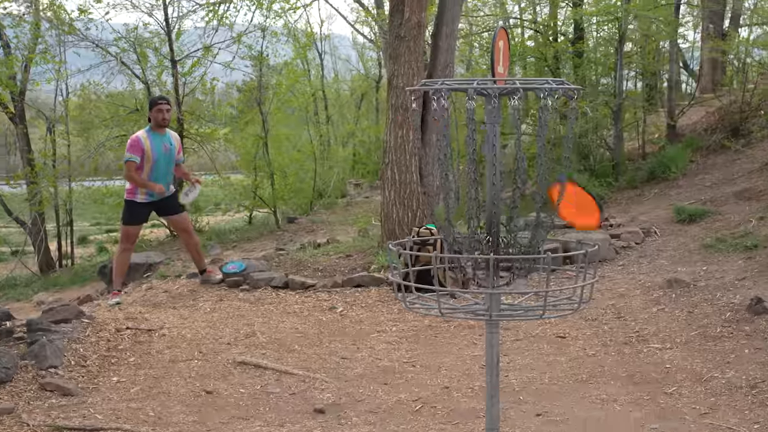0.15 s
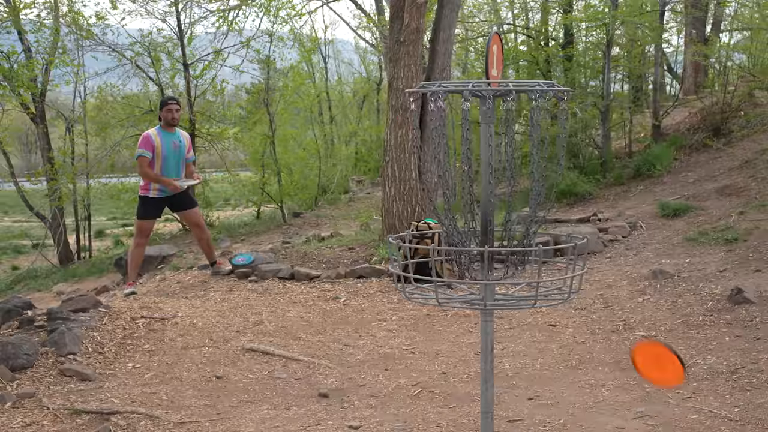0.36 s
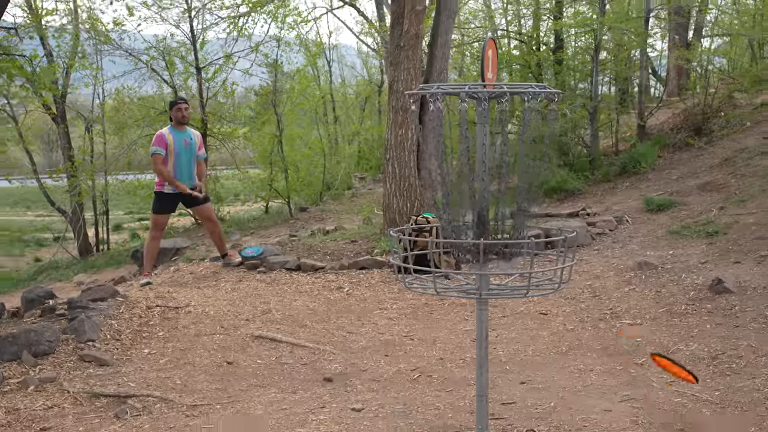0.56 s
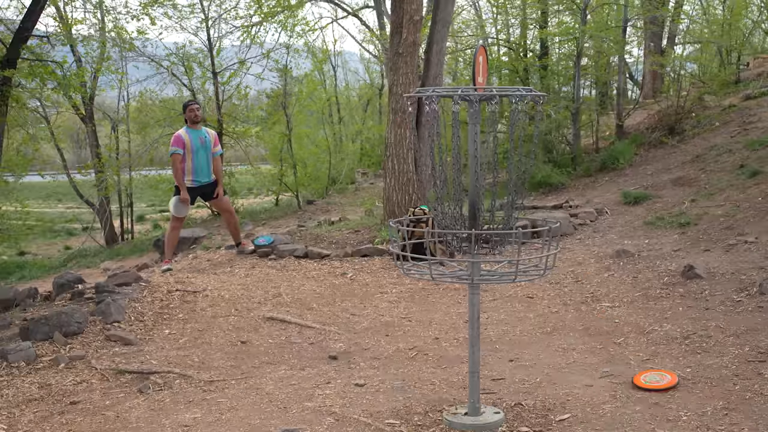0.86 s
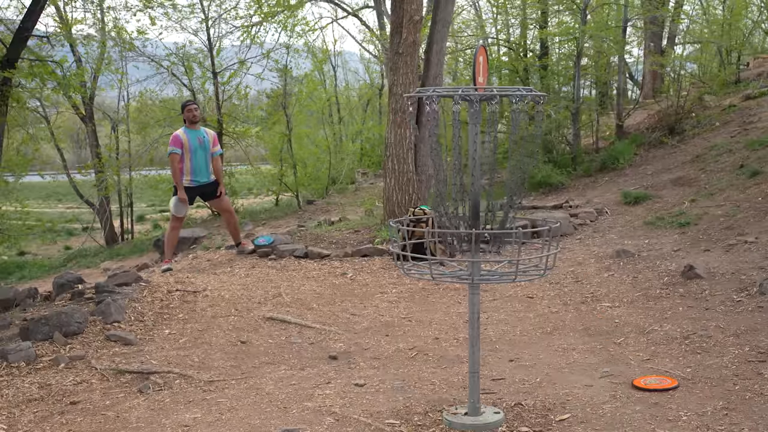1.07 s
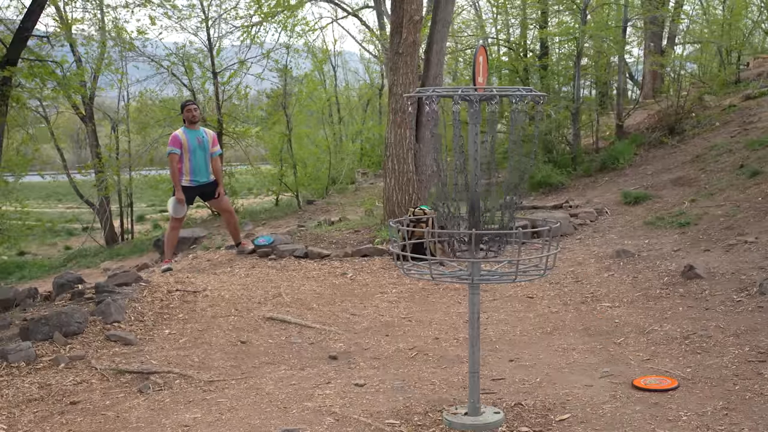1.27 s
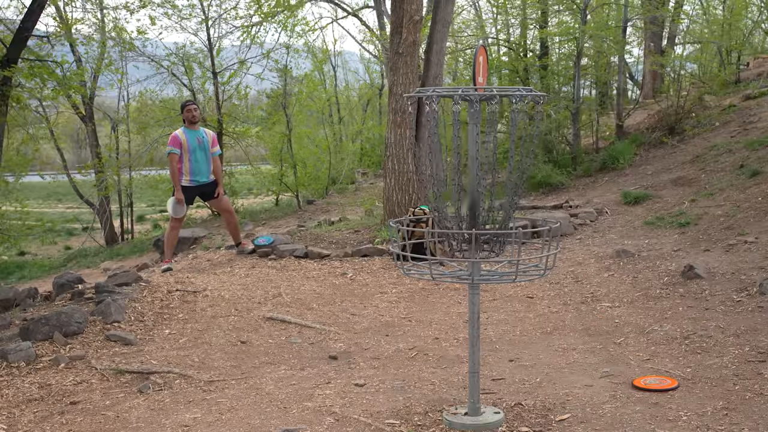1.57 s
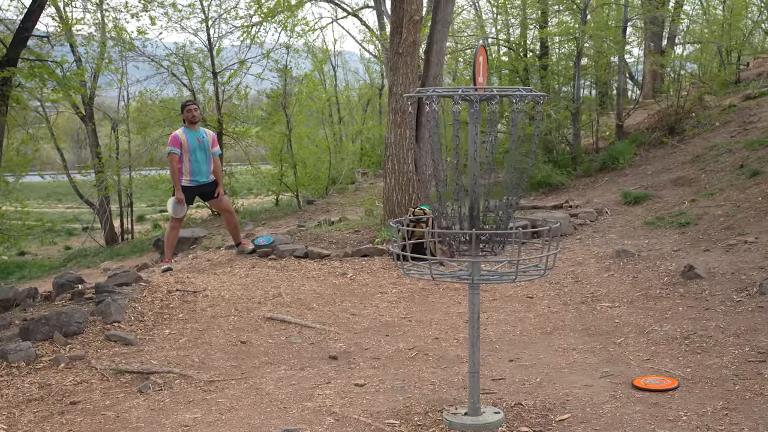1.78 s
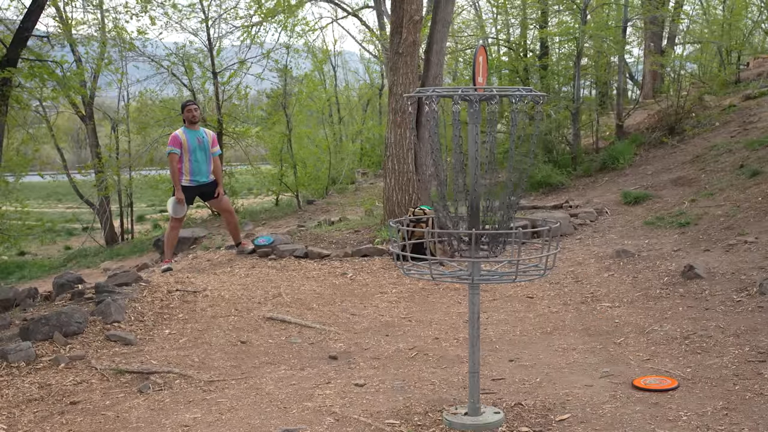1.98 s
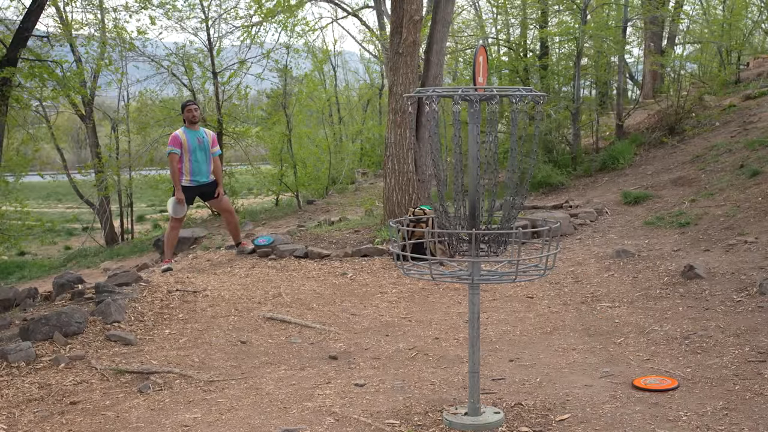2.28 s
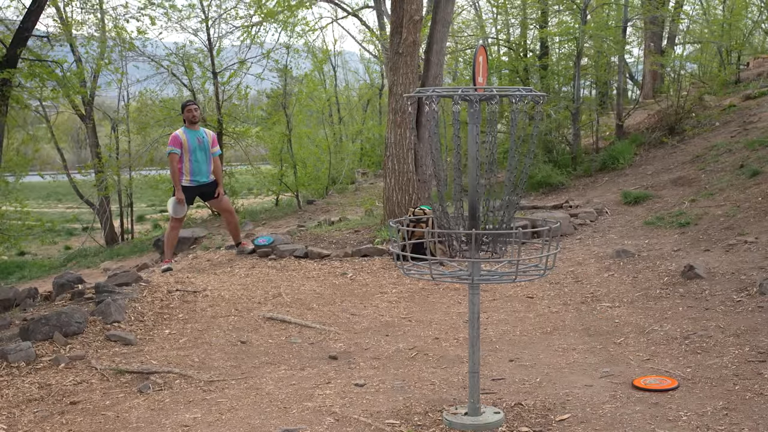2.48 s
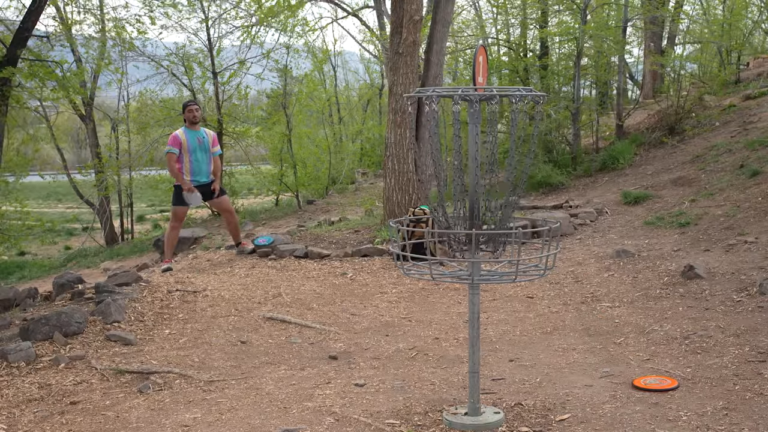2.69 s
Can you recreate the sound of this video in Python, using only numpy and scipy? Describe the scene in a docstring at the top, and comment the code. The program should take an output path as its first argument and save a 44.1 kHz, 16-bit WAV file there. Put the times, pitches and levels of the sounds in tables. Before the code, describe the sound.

Steel chains clash loudly at once as a disc hits, jangling close to the microphone; the disc thuds on dry dirt and bounces, links thin to tinkles over quiet outdoor air and faint distant engine drone.

```python
"""Outdoors on dry dirt, near a steel basket hung with chains that a thrown disc has just hit.
Far off, engine tones waver and a bird chirps over a hush of shaped noise.
Nearby the disc drops out and bounces: short body modes and bursts of grit noise.
Links rub, clatter and jangle as random contacts, then thin out to single ringing tinkles.
Chains knock on the steel: each blow is a noise crack, a short clank and decaying low and high rings."""
import sys
import numpy as np
from scipy import signal
from scipy.fft import rfft, irfft, next_fast_len
from scipy.io import wavfile

SR = 44100
rng = np.random.default_rng(int(sys.argv[2]) if len(sys.argv) > 2 else 0)


def to_wav(s):
    """Save 16-bit WAV."""
    ch = np.atleast_2d(s).T  # columns
    pcm = np.round(np.clip(ch, -1, 1) * 32767)  # PCM
    wavfile.write(sys.argv[1], SR, pcm.astype(np.int16))


N = 125685
T = np.arange(N) / SR  # time [s]


def from_db(db):
    """Decibels to amplitude gain."""
    return 10 ** (np.asarray(db) / 20)


def rms_one(x):
    """Scale to unit rms."""
    return x / np.sqrt(np.mean(x ** 2) + 1e-20)


def in_time(rows):
    """Join (time [s], value) rows by straight lines."""
    return np.interp(T, *np.transpose(rows))


def drift(corner_hz):
    """Slow chance of unit rms: noise at SR / 40 through two equal low-pass poles."""
    pole = np.exp(-80 * np.pi * corner_hz / SR)
    white = rng.standard_normal(N // 40 + 2002)
    slow = signal.lfilter([1], [1, -2 * pole, pole * pole], white)[2000:]  # skip the filter's start
    return np.interp(np.arange(N) / 40, np.arange(len(slow)), rms_one(slow))


def noise(spectrum):
    """Steady noise of unit rms, coloured by (frequency [Hz], relative density [dB]) rows."""
    hz, db = np.transpose(spectrum)
    size = next_fast_len(N)
    white = rfft(rng.standard_normal(size))
    bin_hz = np.arange(len(white)) * SR / size
    gain = from_db(np.interp(np.log(bin_hz + 1), np.log(hz), db))
    return rms_one(irfft(white * gain, size)[:N])


def clicks(times, levels_db):
    """One single-sample click at each time."""
    out = np.zeros(N)
    samples = np.clip(np.asarray(times) * SR, 0, N - 1).astype(int)
    np.add.at(out, samples, from_db(levels_db))
    return out


def random_clicks(per_s, spread_db):
    """Contacts at random moments; the spread sets how uneven their strength is."""
    happens = rng.random(N) < per_s / SR
    return happens * from_db(spread_db * np.minimum(rng.exponential(1, N), 3))


def dying(hits, t60):
    """Envelope that jumps at each click; its power falls 60 dB in t60 [s]."""
    power_decay = from_db(-120 / (t60 * SR))
    return np.sqrt(signal.lfilter([1], [1, -power_decay], hits ** 2 + 1e-24))


CHOKE_S = 0.012  # fade of a choked ring once the next blow lands
PHASE_SPREAD_RAD = 1.5


def strike(times, levels, modes, detune, scatter_db, choked=False):
    """Each blow rings all modes with its own slight detuning and balance; a choked ring stops at the next."""
    hz, db, t60 = np.transpose(modes)[:, :, None]
    t = T[:int(SR * min(t60.max(), 1))].astype(np.float32)
    decay = from_db(db - 60 * t / t60).astype(np.float32)
    out = np.zeros(N + SR)
    gaps = np.diff(times, append=T[-1])
    for time, gap, level in zip(times, gaps, levels):
        pitch, size, phase = rng.standard_normal((3, len(modes), 1))
        held = np.clip((gap - t) / CHOKE_S + 1, 0, 1) if choked else np.ones(len(t))
        n = np.count_nonzero(held)
        start = max(int(time * SR), 0)
        omega = np.float32(2 * np.pi * hz * (1 + detune * pitch))
        waves = decay[:, :n] * np.sin(omega * t[:n] + np.float32(PHASE_SPREAD_RAD * phase))
        mode_gain = np.float32(from_db(level + scatter_db * size))
        out[start:start + n] += held[:n] * (mode_gain * waves).sum(axis=0)
    return out[:N]


def ring(hits, hz, t60):
    """Two-pole resonator: a unit click sets a decaying sine of height 1 ringing."""
    r = from_db(-60 / (t60 * SR))
    w = 2 * np.pi * hz / SR
    return signal.lfilter([0, np.sin(w)], [1, -2 * r * np.cos(w), r * r], hits + 1e-18)


def flutter(x, depth):
    """Make a tone flutter in level, as ringing steel chattering on its neighbours does."""
    return x * (1 + depth * drift(52)) / np.sqrt(1 + depth ** 2)


# Outdoor hush and far traffic, colour: (frequency [Hz], relative density [dB])
HUSH_COLOUR = [(30, -46), (55, -37), (80, -9), (110, -1.5), (170, 3.5), (230, 3.5), (330, -6), (520, -12.5),
               (900, -5.5), (1300, -7), (2000, -13.5), (3000, -22), (4500, -31), (8000, -38), (15500, -42)]
# Level of the hush: (time [s], level [dB])
HUSH_LEVEL = [(0, -46), (.6, -48.5), (1.1, -48), (1.4, -51), (1.9, -49.5), (2.3, -51), (2.6, -47.5),
              (2.85, -50.5)]


def hush():
    """The open air and far traffic blend into coloured noise that slowly swells and sinks."""
    return from_db(in_time(HUSH_LEVEL)) * noise(HUSH_COLOUR)


def drone(hz, db):
    """A far engine's firing tone, its pitch and level wavering on its way."""
    phase = 2 * np.pi * np.cumsum(hz * (1 + 0.018 * drift(12))) / SR
    level_db = db + 1.5 * drift(9)
    return np.sqrt(2) * from_db(level_db) * np.sin(phase)


# Firing tone of the main far engine, before its waver: (time [s], frequency [Hz])
ENGINE_PITCH = [(0, 156), (.12, 146), (.22, 128), (.4, 126), (.6, 122), (.85, 126), (1.2, 129), (1.55, 133),
                (2.2, 133.5), (2.45, 138), (2.85, 143)]
# Its level before the trim: (time [s], level [dB])
ENGINE_LEVEL = [(0.0, -43.5), (0.05, -53), (0.13, -42), (0.19, -48), (1.52, -49.5), (2.13, -44.5),
                (2.21, -52), (2.58, -44), (2.79, -52.5), (2.85, -39.5)]
ENGINE_TRIM_DB = -0.5
# Other far drones that swell and fade: (frequency [Hz], middle time [s], width [s], level [dB])
DRONES = [(85, 1.2, 3.0, -65), (88, 2.57, 0.19, -53.5), (152, 2.074, 0.18, -46), (298, 2.15, 0.23, -58.5)]


def engines():
    """One engine tone glides throughout; the others swell and fade as bell curves."""
    out = drone(in_time(ENGINE_PITCH), in_time(ENGINE_LEVEL) + ENGINE_TRIM_DB)
    for hz, middle, width, db in DRONES:
        out += drone(hz, db) * np.exp(-((T - middle) / width) ** 2)
    return out


# Chirps of the far bird: (time [s], frequency [Hz], level before roughening [dB])
CHIRPS = [(1.885, 4420, -61.5), (1.972, 4360, -59.5), (2.075, 4370, -65), (2.1, 4310, -63),
          (2.201, 4330, -63), (2.3, 4300, -66)]
CHIRP_WIDTH_S, CHIRP_ROUGHNESS = 0.012, 0.85


def bird():
    """A far bird gives faint, short, steady-pitched chirps with a rough level."""
    out = np.zeros(N)
    for time, hz, db in CHIRPS:
        swell = np.exp(-((T - time) / CHIRP_WIDTH_S) ** 2)
        out += from_db(db) * swell * np.sin(2 * np.pi * hz * T)
    return flutter(out, CHIRP_ROUGHNESS)


WOODS_DB, WOODS_T60_S = -12.5, 0.47


def woods(x):
    """Trunks and ground scatter the near sound back as a faint, decaying noise tail."""
    t = T[:SR]
    tail = rng.standard_normal(SR) * from_db(-60 * t / WOODS_T60_S)
    tail *= t > .012  # the first scatter arrives after 12 ms
    return from_db(WOODS_DB) * signal.fftconvolve(x, tail / np.linalg.norm(tail))[:N]


# The disc meets the ground: (time [s], body level [dB], grit level [dB])
LANDINGS = [(0.4706, -28.5, -31), (0.506, -51, -38), (0.656, -57, -38.5), (0.836, -33.5, -30),
            (0.859, -41, -36)]
# Modes of the disc: (frequency [Hz], relative level [dB], t60 [s])
DISC_MODES = [(321, -10.5, 0.063), (410, -2, 0.033), (543, -14, 0.033), (642, 1, 0.037),
              (1058, -13.5, 0.081)]
# Colour of the grit: (frequency [Hz], relative density [dB])
GRIT_COLOUR = [(40, -45), (130, -16), (300, -0.5), (700, 4), (1200, -4.5), (2600, -4.5), (5000, -28),
               (12000, -47)]
GRIT_T60_S, DISC_LOW_CUT_HZ = 0.034, 180  # the disc's sounds carry little bass


def landings():
    """The plastic disc knocks on dry dirt and bounces: damped body modes plus bursts of grit."""
    times, body_db, grit_db = np.transpose(LANDINGS)
    body = strike(times, body_db, DISC_MODES, detune=0.019, scatter_db=1.5)
    grit = noise(GRIT_COLOUR) * dying(clicks(times, grit_db), GRIT_T60_S)
    low_cut = signal.butter(3, DISC_LOW_CUT_HZ, "high", fs=SR, output="sos")
    return signal.sosfilt(low_cut, body + grit)


# Links sliding on each other: (time [s], level [dB])
RUB_LEVEL = [(0.9, -84), (0.95, -66), (1.0, -66.5), (1.1, -61.5), (1.3, -70), (1.38, -84), (1.7, -76),
             (1.72, -66.5), (1.8, -69.5), (1.93, -68.5), (2.0, -91), (2.2, -95.5)]
# Colour of the rubbing: (frequency [Hz], relative density [dB])
RUB_COLOUR = [(3500, -28.5), (4700, -7.5), (5100, 3.5), (5600, -13), (6500, -16), (6780, -4), (7050, -19),
              (8500, -16), (8800, -4), (9150, -20), (10800, -20), (11100, -8.5), (11700, -5),
              (12200, -23.5)]
RUB_PER_S, RUB_T60_S = 200, .04


def rubbing():
    """Swaying links slide over each other in tiny random slips, each a burst of noise."""
    hiss = noise(RUB_COLOUR)
    slips = rms_one(dying(random_clicks(RUB_PER_S, spread_db=2.5), RUB_T60_S))
    return from_db(in_time(RUB_LEVEL)) * hiss * slips


# The chains' dry rattle before trim and last fade: (time [s], level [dB])
CLATTER_LEVEL = [(0.0, -32.5), (0.128, -43.5), (0.132, -37), (0.24, -48.5), (0.392, -46.5), (0.408, -39),
                 (0.428, -43), (0.646, -59.5), (0.67, -55), (0.716, -58), (0.728, -54), (0.974, -68),
                 (1.134, -56.5), (1.4, -84)]
# Colour of the rattle: (frequency [Hz], relative density [dB])
CLATTER_COLOUR = [(250, -27), (500, -10.5), (1200, -0.5), (2200, -2.5), (2700, -6.5), (3150, 8.5),
                  (3700, -7.5), (4400, -3), (5200, -3), (7000, -15), (8250, -8.5), (10000, -6.5),
                  (11500, -16), (15500, -9.5)]
CLATTER_PER_S, CLATTER_T60_S = 480, 0.038
CLATTER_TRIM_DB, CLATTER_FADE_DB_PER_S = 2, 17  # the fade starts at the last row


def clatter():
    """Dense damped contacts of links on the disc and on each other, as bursts of noise."""
    after_last = np.maximum(T - CLATTER_LEVEL[-1][0], 0)
    level_db = in_time(CLATTER_LEVEL) + CLATTER_TRIM_DB - CLATTER_FADE_DB_PER_S * after_last
    rattle = noise(CLATTER_COLOUR)
    contacts = rms_one(dying(random_clicks(CLATTER_PER_S, spread_db=-2.0), CLATTER_T60_S))
    return from_db(level_db) * rattle * contacts


# Top modes of a link: (frequency [Hz], relative level [dB], t60 [s])
LINK_TOP = [(12640, -10, .1), (12820, -6, .13), (12950, -6, .17), (13620, -17, .15), (14100, -9, .14),
            (14220, -9, .14), (15330, -18, .1)]
# Middle modes of a link: (frequency [Hz], relative level [dB], t60 [s])
LINK_MIDDLE = [(4890, -11, .09), (4910, -9, .1), (5000, -7, .1), (5440, -17.5, .08), (6770, -5, 0.09),
               (7300, -17, 0.14), (7650, -14.5, .16), (8270, -13.5, 0.14), (8880, -10, .22),
               (11140, -9, 0.25), (11680, -13, 0.11)]
LINK_FLUTTER = .55  # depth
# The jostling links before the trim: (time [s], level [dB])
JANGLE_LEVEL = [(0.0, -27.5), (0.31, -39.5), (0.42, -28), (0.44, -40), (0.65, -54), (0.68, -45),
                (1.09, -59), (1.11, -41), (1.32, -74), (2.06, -65.5), (2.25, -82.5), (2.85, -79)]
JANGLE_PER_S, JANGLE_TRIM_DB, JANGLE_MIDDLE_DB = 300, -9, -8


def jangle(count=3):
    """Slightly unlike links jostle at random, each contact ringing all modes of its link."""
    out = np.zeros(N)
    for link in range(count):
        hits = random_clicks(JANGLE_PER_S / count, spread_db=0.0)
        rings = np.zeros(N)
        for modes, modes_db in ((LINK_TOP, 0), (LINK_MIDDLE, JANGLE_MIDDLE_DB)):
            for hz, db, t60 in modes:
                link_hz = hz * (1 + .006 * rng.standard_normal())
                rings += from_db(db + modes_db) * ring(hits, link_hz, t60)
        out += flutter(rings, LINK_FLUTTER)
    return from_db(JANGLE_TRIM_DB + in_time(JANGLE_LEVEL)) * rms_one(out)


# Single taps, levels before trims: (time [s], top modes level [dB], middle modes level [dB])
TINKLES = [(0.113, -31, -42), (0.251, -29.5, -70), (0.297, -32, -52), (0.352, -27, -62), (0.379, -33, -33),
           (0.4055, -23, -33), (0.47, -26, -45.5), (0.526, -32.5, -42), (0.5948, -37, -60),
           (0.6492, -48, -57), (0.6831, -28.5, -48), (0.756, -32, -52), (0.785, -32, -58),
           (0.845, -37.5, -60), (0.8831, -28, -69), (0.949, -56, -61), (0.9865, -44, -63), (1.04, -39, -55),
           (1.089, -44, -49), (1.123, -39, -46.5), (1.175, -58, -63), (1.2329, -40.5, -57),
           (1.26, -50, -51), (1.29, -46, -47), (1.3982, -49, -66), (1.411, -40.5, -59), (1.445, -50, -75),
           (1.4978, -54, -74), (1.5475, -46.5, -55), (1.60, -50, -64), (1.6338, -50, -62),
           (1.7173, -49, -46), (1.7814, -50, -52.5), (1.858, -48.5, -65), (1.9005, -48, -66),
           (2.0181, -43, -70), (2.053, -45.5, -66), (2.1972, -56.5, -72), (2.6984, -62, -63)]
# Colour of two links touching: (frequency [Hz], relative density [dB])
TICK_COLOUR = [(2000, -6), (4000, -8), (5200, 2), (7000, -17), (9000, -18), (11000, -17), (12800, 4),
               (13500, 2.5), (14200, 1), (15800, 1)]
TICK_TRIM_DB, LINK_TOP_TRIM_DB, LINK_MIDDLE_TRIM_DB = -16, -6.5, -5.5
TICK_T60_S, LINK_DETUNE, LINK_SCATTER_DB = 0.048, .004, 0.5


def tinkles():
    """Single links tap as the chains swing out: a noise tick and a thin, fluttering ring."""
    times, top_db, middle_db = np.transpose(TINKLES)
    tick = noise(TICK_COLOUR) * dying(clicks(times, top_db + TICK_TRIM_DB), TICK_T60_S)
    top = strike(times, top_db + LINK_TOP_TRIM_DB, LINK_TOP, LINK_DETUNE, LINK_SCATTER_DB)
    middle = strike(times, middle_db + LINK_MIDDLE_TRIM_DB, LINK_MIDDLE, LINK_DETUNE, LINK_SCATTER_DB)
    return tick + flutter(top, LINK_FLUTTER) + flutter(middle, LINK_FLUTTER)


# Chains hit the steel, levels before trims:
# (time [s], low ring level [dB], high ring level [dB], crack level [dB])
KNOCKS = [(0.001, -31, -21.5, -40), (0.0221, -16, -39, -25.5), (0.055, -18, -26, -32),
          (0.083, -14, -26, -34), (0.1125, -24.5, -18, -22.5), (0.1344, -18, -21, -18),
          (0.173, -23.5, -29, -21), (0.2238, -29, -57, -42), (0.252, -26.5, -54, -41),
          (0.2953, -28, -47, -33), (0.3096, -27.5, -35.5, -36), (0.3606, -27.5, -43, -33),
          (0.4057, -15.5, -37, -24.5), (0.428, -24.5, -47, -48), (0.4726, -29.5, -48, -49),
          (0.5225, -30.5, -50, -42), (0.5534, -34, -48, -37.5), (0.666, -26, -49, -30.5),
          (0.728, -34.5, -57, -37.5), (0.769, -29, -53, -38.5), (0.85, -35, -71, -50),
          (1.143, -37.5, -69, -43), (1.515, -43.5, -77, -49.5), (2.288, -51, -74, -58)]
# Colour of the crack: (frequency [Hz], relative density [dB])
CRACK_COLOUR = [(40, -55), (300, -43.5), (700, -18), (1300, -3), (2200, -12), (2700, -2.5), (3200, 3.5),
                (3900, -4.5), (5500, -3), (7000, -23.5), (9000, -14.5), (12000, -17.5), (16000, -21)]
# Short modes that go with the crack: (frequency [Hz], relative level [dB], t60 [s])
CLANK_MODES = [(2044, -10, 0.092), (2166, -12, 0.14), (2293, -7, .07), (2880, -10.5, 0.035),
               (3293, -2, 0.099), (3403, -5.5, 0.096)]
# Low ring of the steel: (frequency [Hz], relative level [dB], t60 [s])
LOW_RING = [(2912, -9, .22), (2927, -1, .52), (2964, -11, .18), (3018, -17, .12), (3092, -15, .14),
            (3117, -15, .24), (3148, -15, .3), (3379, -16, .2), (3528, -23, .18)]
# High ring, woken by hard knocks: (frequency [Hz], relative level [dB], t60 [s])
HIGH_RING = [(3779, -16, .35), (4960, -20, .12), (5286, -16, .2), (8129, -10, .22), (8180, -3, .26),
             (8235, -5, .24), (8331, -11, .22), (11654, -18, .3), (15270, -18, .2), (15562, -4, .35)]
CRACK_TRIM_DB, CLANK_TRIM_DB, LOW_TRIM_DB, HIGH_TRIM_DB = -5.5, -4.5, -2, -4
CRACK_T60_S, RING_DETUNE, RING_SCATTER_DB = .05, 0.0017, 0.36
STEEL_FLUTTER = 0.42  # depth


def knocks():
    """Chains hit the steel: a crack, a short clank, a high ring and a low one choked by the next blow."""
    times, low_db, high_db, crack_db = np.transpose(KNOCKS)
    crack = noise(CRACK_COLOUR) * dying(clicks(times, crack_db + CRACK_TRIM_DB), CRACK_T60_S)
    clank = strike(times, crack_db + CLANK_TRIM_DB, CLANK_MODES, detune=0.01, scatter_db=1.5)
    low = strike(times, low_db + LOW_TRIM_DB, LOW_RING, RING_DETUNE, RING_SCATTER_DB, choked=True)
    high = strike(times, high_db + HIGH_TRIM_DB, HIGH_RING, RING_DETUNE, RING_SCATTER_DB)
    return crack + clank + flutter(low, STEEL_FLUTTER) + flutter(high, STEEL_FLUTTER)


def scene():
    """The near chains and disc, their scatter from the woods, and the far background."""
    chains = knocks() + tinkles() + jangle() + clatter() + rubbing()
    low_cut = signal.butter(2, 510, "high", fs=SR, output="sos")  # the chains carry no deep bass
    near = signal.sosfilt(low_cut, chains) + landings()
    scattered = woods(near)
    background = engines() + hush() + bird()
    return (near + scattered + background)[None]


def record(dry):
    """The microphone sheds the deep bass; the top is cut steeply."""
    bass_cut = signal.butter(4, 60, "high", fs=SR, output="sos")
    top_cut = signal.ellip(12, .2, 80, 15850, fs=SR, output="sos")
    return signal.sosfilt(top_cut, signal.sosfilt(bass_cut, dry))


dry = scene()
out = record(dry)
to_wav(out)
```